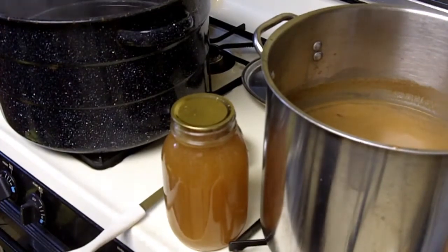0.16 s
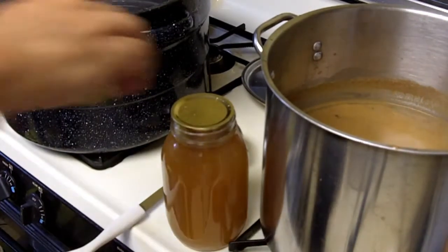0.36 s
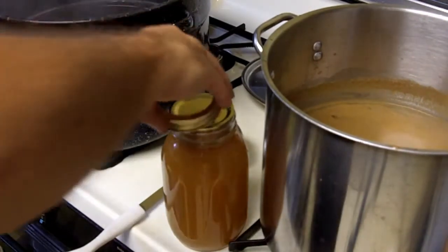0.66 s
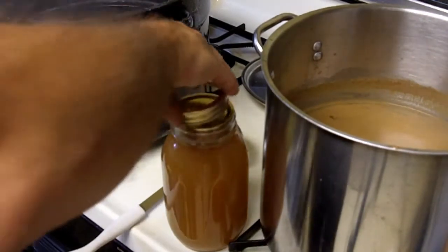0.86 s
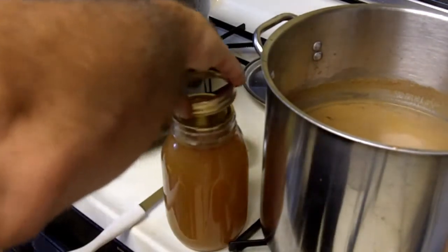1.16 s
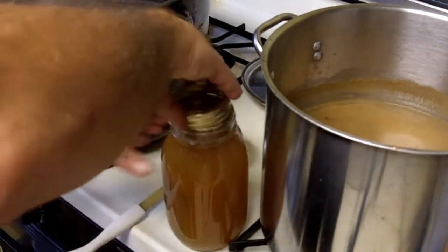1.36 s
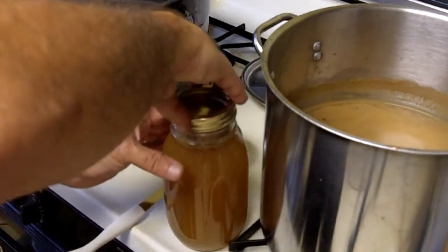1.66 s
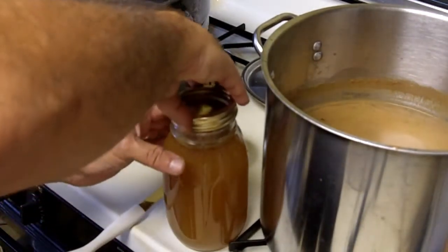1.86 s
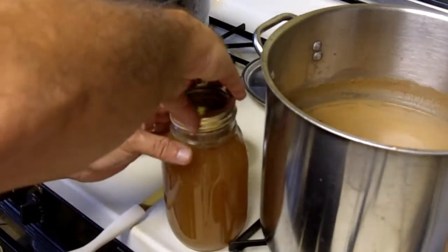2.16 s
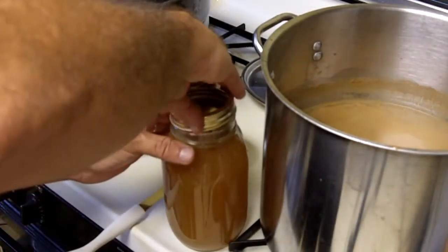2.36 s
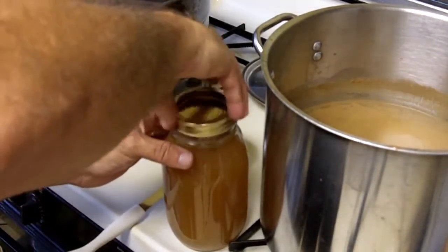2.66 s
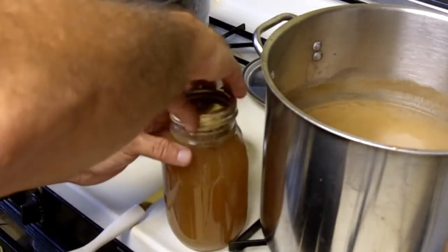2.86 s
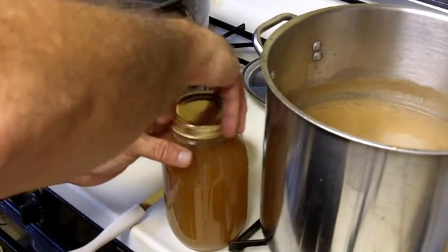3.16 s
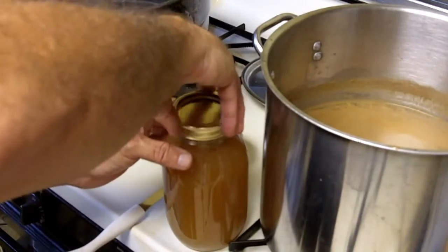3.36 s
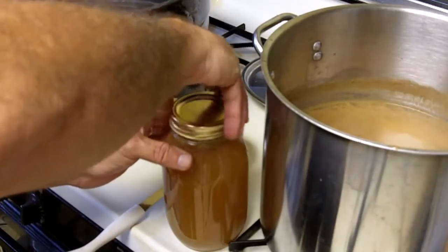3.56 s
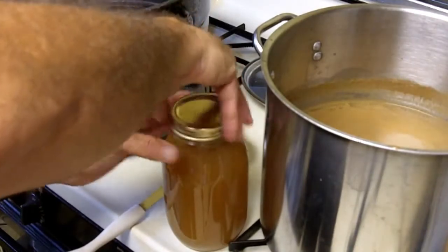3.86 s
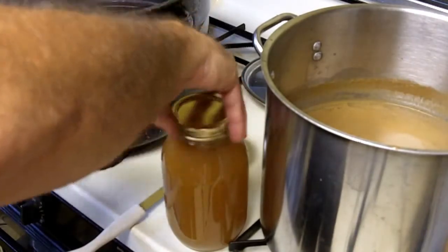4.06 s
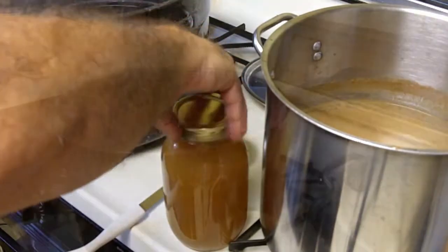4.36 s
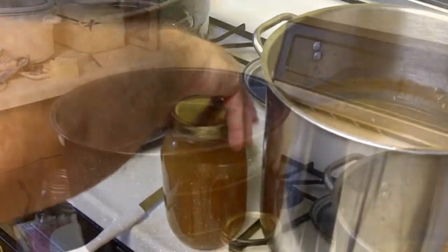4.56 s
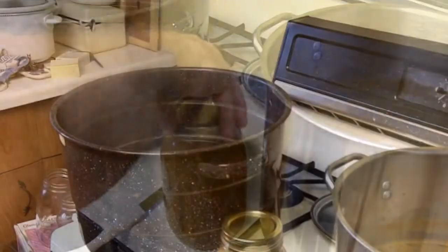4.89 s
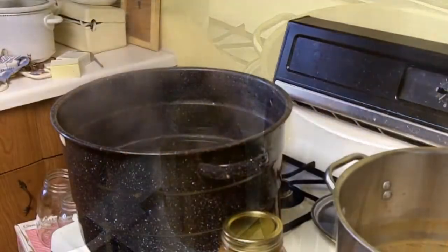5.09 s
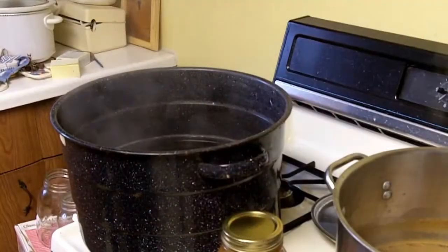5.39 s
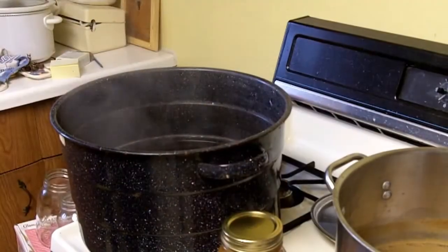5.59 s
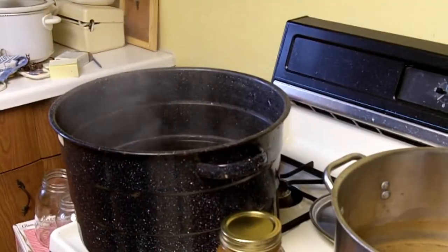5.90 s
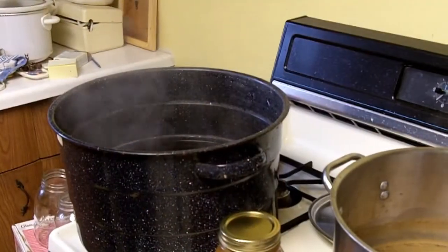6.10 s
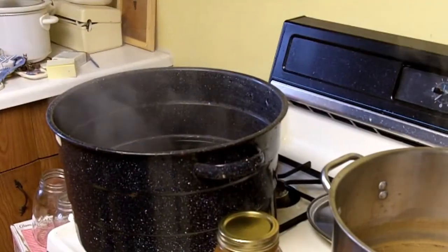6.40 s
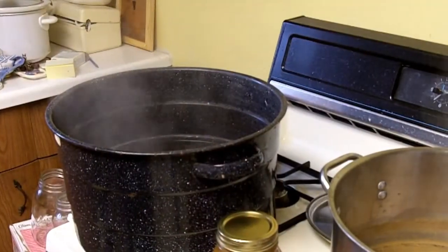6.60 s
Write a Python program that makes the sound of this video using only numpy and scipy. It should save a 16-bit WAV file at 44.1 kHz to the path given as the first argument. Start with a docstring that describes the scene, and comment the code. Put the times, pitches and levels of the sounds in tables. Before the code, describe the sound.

A quiet small kitchen, nearly mono, with faint hiss, slight mains hum and low hand-held rumble. From 0 to 1.5 s there are only soft camera jolts and arm or cloth rustle. Around 1.55 s sparse, faint ticks of a thin metal band on glass begin, close by. From 2.6 to 3.2 s they become brighter and louder, clustered clicks with short rasping thread scrapes. Soft bumps fall near 3.4 and 3.5 s, then tighter, drier scrapes at about 3.7, 4.0 and 4.3 s. Rustle rises; two dull knocks land near 4.65 s, lesser ones around 5.0 to 5.15 s, then tiny high clinks from 5.2 to 5.35 s with a soft low click. At 6.03 s a big pot clanks loudly, a hollow, quickly fading boom around 490 Hz. A faint wavering tone follows from 6.25 s, then softer, muffled pot thuds from 6.55 to 6.65 s.

```python
"""A metal screw band is set on a glass jar and turned down: struck modes tick, trains of tiny slips scrape.
Knocks (decaying noise) and bright clinks (high modes) are heard in the small kitchen.
Then a big pot of hot water clanks on the stove: low beating modes under upper wall modes; a faint tone swells.
A soft low click (filtered pulse) marks an edit cut.
A nearly mono hand-held camera adds rumble to coloured room noise, rustle, hiss and mains hum."""
import sys
import numpy as np
from scipy import signal
from scipy.fft import rfft, irfft, next_fast_len
from scipy.io import wavfile
from scipy.ndimage import uniform_filter1d

SR = 44100
rng = np.random.default_rng(int(sys.argv[2]) if len(sys.argv) > 2 else 0)


def master(y):
    """Save y as 16-bit WAV."""
    cut = np.clip(np.atleast_2d(y).T, -1, 1)
    pcm = np.round(cut * 32767)  # scale
    wavfile.write(sys.argv[1], SR, pcm.astype(np.int16))


N = 297234
TIME = np.arange(N) / SR
RING_TIME = TIME[:SR // 2]


def from_db(db):
    """Decibels to amplitude gain."""
    return 10 ** (np.asarray(db) / 20)


def rms_one(x):
    """Scale to unit power."""
    return x / np.sqrt(np.mean(x ** 2) + 1e-20)


def attack_one(x):
    """Scale a blow to unit power over its first 5 ms."""
    return x / np.sqrt(np.mean(x[:SR // 200] ** 2) + 1e-20)


def gains(rows):
    """Interpolate rows of (s, dB, ..) in dB into one gain curve per level column."""
    times_s, *columns_db = np.transpose(rows)
    return [from_db(np.interp(TIME, times_s, db)) for db in columns_db]


def cut(x, hz, kind, order=2):
    """Butterworth filter."""
    sections = signal.butter(order, np.minimum(hz, .45 * SR), kind, fs=SR, output="sos")
    return signal.sosfilt(sections, x + 1e-18)


def coloured(x, spectrum):
    """Shape x by (Hz, dB) points, with 12 dB/octave slopes outside them; unit power."""
    hz, db = np.transpose(spectrum)
    size = next_fast_len(len(x))
    f = np.maximum(np.arange(size // 2 + 1) * SR / size, 1)
    shape = from_db(np.interp(np.log(f), np.log(hz), db))
    shape = shape * np.minimum(f / hz[0], 1) ** 2 * np.minimum(hz[-1] / f, 1) ** 2
    return rms_one(irfft(rfft(x, size) * shape, size)[:len(x)])


def noise(spectrum, size=N):
    """Gaussian noise of a given colour; unit power."""
    return coloured(rng.standard_normal(size), spectrum)


def fade(t60_s):
    """Exponential decay, 60 dB in t60_s."""
    return from_db(-60 * RING_TIME / max(t60_s, 1e-3))


def crack(spectrum, t60_s):
    """Decaying noise: the dense, quickly dying modes of a contact."""
    return noise(spectrum, size=len(RING_TIME)) * fade(t60_s)


def ring(modes, pitch=1, uneven=False):
    """Sum of decaying sines; uneven varies mode strengths with where the blow lands."""
    offsets_db = uneven * rng.uniform(-4, 4, len(modes))
    total = 0
    for (hz, db, t60_s), offset_db in zip(modes, offsets_db):
        partial = np.sin(2 * np.pi * hz * pitch * RING_TIME) * fade(t60_s)
        total = total + from_db(db + offset_db) * partial
    return attack_one(total)


def add(track, start_s, sound):
    """Mix a sound in at a time."""
    start = round(start_s * SR)
    track[start:start + len(sound)] += sound[:N - start]


# Camera tremble, least while the jar is worked on. Each row: time in seconds, rumble in dB.
TREMBLE = [(0, -48.5), (1.6, -47.5), (2, -58), (3.3, -52.5), (4.3, -54.5), (4.7, -46), (5.6, -46.5),
           (6.74, -46)]
# Camera jolts. Each row: start in seconds, rumble in dB.
JOLTS = [(.33, -35.5), (.89, -37), (.99, -35.5), (1.24, -36), (4.44, -37), (5.68, -40)]
JOLT_ATTACK_S, JOLT_T60_S = 0.033, 1


def camera_shake():
    """Rumble gain: powers of a steady tremble and of jolts that rise quickly and sway to rest."""
    power = gains(TREMBLE)[0] ** 2
    for start_s, db in JOLTS:
        since_s = TIME - start_s
        rise = np.clip(since_s / JOLT_ATTACK_S, 0, 1)
        fall_db = 60 * np.maximum(since_s - JOLT_ATTACK_S, 0) / JOLT_T60_S
        power = power + (rise * from_db(db - fall_db)) ** 2
    return np.sqrt(power)


# Steady background. Each row: time in seconds, low room noise in dB, hiss in dB, both before layer trims.
AIR = [(0, -66, -69.5), (2.1, -64.5, -74.5), (4, -61.5, -69.5), (5, -60.5, -68), (6.74, -64, -75.5)]
# Arm and clothes moving. Each row: middle in seconds, length in seconds, hiss in dB, dull part in dB,
# both before layer trims.
RUSTLES = [(.38, 0.74, -64, -67), (0.9, 0.6, -69, -61), (1.327, 0.96, -64, -65.5), (1.75, 0.26, -68, -75),
           (2.385, 0.59, -75, -72), (3.494, 0.48, -76, -56), (3.8, .25, -101, -61.5),
           (4.618, 0.49, -60.5, -55.5), (4.813, 0.59, -60, -53.5), (5.086, 0.8, -62, -58),
           (5.789, 0.57, -65.5, -63), (6.456, 0.97, -66.5, -64), (6.717, 0.56, -76, -55.5)]


def air_and_rustle():
    """Room-noise and hiss gains: each movement is a half-cosine swell power-summed with the background."""
    room, hiss = gains(AIR)
    for middle_s, length_s, hiss_db, dull_db in RUSTLES:
        swell = np.cos(np.pi * np.clip((TIME - middle_s) / length_s, -.5, .5))
        room = np.hypot(room, from_db(dull_db) * swell)
        hiss = np.hypot(hiss, from_db(hiss_db) * swell)
    return room, hiss


# Noise colours. Each row: frequency in Hz, relative density in dB per Hz.
RUMBLE_COLOUR = [(11, -1), (15, 17), (19, -12), (25, 2.5), (45, -8.5), (70, -29.5), (110, -31.5),
                 (200, -34.5)]
ROOM_COLOUR = [(40, 6), (70, 12), (130, -7.5), (180, 0), (280, -5.5), (360, -4), (700, -12.5), (1200, -17),
               (2500, -60)]
HISS_COLOUR = [(300, 2.5), (900, 3.5), (1500, 3), (3000, -1.5), (4500, -2.5), (6500, 1), (9000, -8),
               (12000, -14), (15000, -20.5)]
# Mains hum. Each row: frequency in Hz, RMS level in dB.
HUM = [(120, -74), (240, -89.5)]


def background(rumble_db=0, room_db=1, hiss_db=1, side_db=-14):
    """Camera rumble, room noise, rustle and hiss as coloured noise, plus hum sines; almost mono."""
    room, hiss = air_and_rustle()
    still_room, still_hiss = gains(AIR)
    mid = from_db(rumble_db) * camera_shake() * noise(RUMBLE_COLOUR)
    mid = mid + from_db(room_db) * room * noise(ROOM_COLOUR)
    mid = mid + from_db(hiss_db) * hiss * noise(HISS_COLOUR)
    # jolts and rustle stay out of the side signal
    side = gains(TREMBLE)[0] * noise(RUMBLE_COLOUR)
    side = side + still_room * noise(ROOM_COLOUR) + still_hiss * noise(HISS_COLOUR)
    hum = sum(from_db(db) * np.sqrt(2) * np.sin(2 * np.pi * hz * TIME) for hz, db in HUM)
    return mid + hum + from_db(side_db) * side * [[1], [-1]]


def chatter(length_s, count=7):
    """A contact is a unit impulse followed by a quick string of random tiny bounces."""
    size = max(int(length_s * SR), 2)
    bounces = np.zeros(size)
    bounces[rng.integers(1, size, count)] = rng.normal(0, .5, count)
    bounces[0] = 1
    return bounces


# Register crossovers, low and high, in Hz.
SPLITS_HZ = [2000, 5400]


def registers(x):
    """Split a sound into top, middle and body."""
    low_hz, high_hz = SPLITS_HZ
    top = cut(x, high_hz, "high", order=4)
    middle = cut(x, SPLITS_HZ, "band", order=4)
    return top, middle, cut(x, low_hz, "low", order=4)


def tilted(db, brightness_db, wall_db=0):
    """Levels in dB of top, middle and body: brightness lifts the top and lowers the body."""
    return db + brightness_db, db + wall_db, db - brightness_db


# Band touching the glass. Each row: start in seconds, level in dB before register trims,
# brightness in dB, chatter length in seconds.
TICKS = [(1.554, -48, 0, .002), (1.758, -53.5, -6.5, 0.0031), (2.019, -53.5, 2.5, .003),
         (2.272, -54, -0.5, .005), (2.327, -60.5, -10.5, 0.011), (2.556, -56, 1, 0.0025),
         (2.597, -44, 3, 0.0036), (2.8036, -35, 5.5, 0.0059), (2.809, -37, 1, .003),
         (2.843, -37.5, 4.5, 0.0021), (2.864, -47.5, 1, 0.0052), (2.906, -49.5, -6.5, .0065),
         (2.943, -52.5, -1, 0.0039), (2.987, -50.5, 0.5, 0.00196), (3.1132, -57.5, -16.5, 0.0069),
         (3.127, -49.5, -6, 0.0026), (3.1593, -38.5, 7, 0.0039), (3.177, -41, 2.5, 0.0025),
         (3.193, -44, 1, .003), (3.397, -55, 11, .005), (3.8455, -57.5, 6.5, 0.0047),
         (3.998, -53, 1, 0.0048), (4.032, -47.5, 2.5, .008), (4.275, -50, 0, 0.0033),
         (4.294, -52.5, -5, 0.0049)]
# Band rings freely while loose, damped as it seats. Each row: time in seconds, ring over crack in dB,
# lift of the 2-5.4 kHz wall tones in dB.
LOOSENESS = [(1.5, 3, 1), (2.6, 0.5, 1), (3.2, -2, -1.5), (4.3, -13, -1.5)]
# Modes of the band on the jar. Each row: nominal frequency in Hz, relative level in dB, t60 in seconds.
BAND_MODES = [(818, -9.5, 0.49), (916, -2, 0.26), (936, 2, 0.12), (1377, -6, 0.15), (1463, -11.5, 0.17),
              (1647, -3, 0.077), (2610, -1.5, 0.029), (2815, -5, 0.039), (3070, 5, 0.026),
              (4230, -31, 0.097), (3945, 2, 0.026), (4334, -1.5, 0.05), (4590, -6.5, 0.11),
              (6220, -1.5, 0.058), (6300, -1.5, 0.075), (6790, 9, 0.018), (7480, 10, 0.013),
              (8200, -2, 0.049), (9340, 8.5, 0.016), (10030, 1, 0.028)]
# Metal-glass contact. Each row: frequency in Hz, relative density in dB per Hz.
CONTACT_COLOUR = [(300, -48), (550, -27), (780, 16), (1150, 4.5), (1500, 3), (2200, -12.5), (4300, -1),
                  (7000, 0.5), (10000, -9), (11500, -14.5), (15000, -40)]


def band_ticks(t60_s=0.041, soft_hz=13000, register_db=(-.5, .5, -.5)):
    """Each touch chatters into a crack and the band's modes, balanced by register."""
    out = np.zeros(N)
    times_s, *columns_db = np.transpose(LOOSENESS)
    for start_s, level_db, brightness_db, length_s in TICKS:
        grip = rng.normal(1, .012)   # pitch ratio: fingers bend the band a little out of tune
        ring_db, wall_db = [np.interp(start_s, times_s, column) for column in columns_db]
        modes = ring(BAND_MODES, pitch=grip, uneven=True)
        response = attack_one(crack(CONTACT_COLOUR, t60_s)) + from_db(ring_db) * modes
        blow = cut(signal.fftconvolve(response, chatter(length_s)), soft_hz, "low")
        levels_db = tilted(level_db, brightness_db, wall_db)
        for part, db, trim_db in zip(registers(blow), levels_db, register_db):
            loudest = np.sqrt(uniform_filter1d(part ** 2, size=SR // 250).max())   # 4 ms RMS
            add(out, start_s, from_db(db + trim_db) * part / loudest)
    return out


SWELL_DB, RELEASE_RANGE_DB = 12, 33.5   # rise up to the peak, fall until a push is over
BODY_RELEASE = 0.98   # body release rate / release rate


def push(swell_s, release_db_per_s):
    """Gains of one push, swelling to a peak then dying away: main, and the slower-fading body."""
    length_s = swell_s + RELEASE_RANGE_DB / release_db_per_s
    t = np.arange(int(length_s * SR)) / SR
    rise_db = SWELL_DB * np.minimum(t / swell_s - 1, 0)
    fall_db = release_db_per_s * np.maximum(t - swell_s, 0)
    return from_db(rise_db - fall_db), from_db(rise_db - BODY_RELEASE * fall_db)


def resound(slips, response):
    """A body's answer to a train of slips; unit power."""
    return rms_one(signal.fftconvolve(slips, response)[:len(slips)])


CATCHES_PER_S, CATCH_DB = 60, 13   # the thread snags and lets go with a larger slip


def slip_train(size, slips_per_s, spread_db, clump_db):
    """Random signed impulses whose rate clumps and whose sizes spread, plus larger catches."""
    catching = from_db(clump_db * noise([(30, 0), (90, -5.0), (250, -10.0)], size))
    slips = (rng.random(size) < slips_per_s * catching / SR) * rng.choice([-1, 1], size)
    slips = slips * from_db(spread_db * np.minimum(rng.exponential(1, size), 3))
    return slips + from_db(CATCH_DB) * (rng.random(size) < CATCHES_PER_S / SR)


# Finger pushes sliding the band along the thread. Each row: start in seconds, swell length in seconds,
# peak level in dB before register trims, brightness in dB, release in dB per second.
TURNS = [(2.599, 0.0051, -48.5, -1, 281.5), (2.851, 0.02, -50.5, -2, 116), (2.907, 0.0188, -52, -0.5, 200),
         (3.122, 0.0031, -49.5, -1, 207), (3.162, .008, -45, -6.5, 272.5), (3.216, 0.068, -48.5, 0.5, 204),
         (3.383, 0.0092, -65.5, -17.5, 171), (3.583, 0.015, -59, -1.5, 107),
         (3.677, 0.039, -52.5, -0.5, 425), (3.844, .006, -65, -15, 220), (3.979, 0.07, -44.5, -1, 380.5),
         (4.268, 0.054, -48, 0, 388.5)]
# A tight band shakes the whole jar. Each row: frequency in Hz, relative level in dB, t60 in seconds.
JAR_MODES = [(453, -6.5, 0.099), (545, 3, .11), (939.4, 5.5, .22), (1385, -8, .09), (1580, 1, .12)]
# Jar modes over the rest of the body. Each row: time in seconds, ratio in dB.
SEATING = [(2.6, 1.5), (3.2, -11.5), (3.8, -8), (4.0, 10.5), (4.35, 8)]


def thread_scrape(slips_per_s=1600, spread_db=5, clump_db=5, ring_db=-3.0, soft_hz=11500,
                  register_db=(-2, -3, -3)):
    """Clumps of tiny slips of metal over glass excite the band's modes, differently with each grip."""
    out = np.zeros(N)
    finger_damping = fade(.06)
    for start_s, swell_s, level_db, brightness_db, release_db_per_s in TURNS:
        effort, body_effort = push(swell_s, release_db_per_s)
        size = len(effort)
        slips = slip_train(size, slips_per_s, spread_db, clump_db)
        # the contact point travels round the rim: crossfade between two responses
        first, last = [resound(slips, finger_damping * ring(BAND_MODES, pitch=grip, uneven=True))
                       for grip in rng.normal(1, .035, 2)]
        angle = np.linspace(0, np.pi / 2, size)
        ringing = np.cos(angle) * first + np.sin(angle) * last
        rub = coloured(slips, CONTACT_COLOUR) + from_db(ring_db) * ringing
        top, middle, body = map(rms_one, registers(cut(rub, soft_hz, "low", order=3)))
        seating = from_db(np.interp(start_s, *np.transpose(SEATING)))
        body = (body + seating * resound(slips, ring(JAR_MODES))) / np.hypot(1, seating)
        parts = top * effort, middle * effort, body * body_effort
        for part, db, trim_db in zip(parts, tilted(level_db, brightness_db), register_db):
            add(out, start_s, from_db(db + trim_db) * part)
    return out


# Small things bumped or shoved. Each row: start in seconds, level in dB before the common trim,
# t60 in seconds, attack in seconds.
KNOCKS = [(3.365, -48.5, 0.34, 0.015), (3.502, -46.5, 0.2, 0.00077), (4.589, -46, 0.15, 0.016),
          (4.655, -36.5, 0.15, 0.00081), (4.686, -32.5, 0.15, 0.0012), (5.0, -43.5, 0.17, .001),
          (5.055, -48, .06, .003), (5.141, -49, 0.16, 0.0018), (6.311, -47.5, 0.12, 0.0033)]
# Each row: frequency in Hz, relative density in dB per Hz.
KNOCK_COLOUR = [(150, -1), (290, -5.5), (370, 6.5), (500, -10), (900, 3), (1800, -0.5), (3000, -9),
                (4500, -9), (7000, -7), (10000, -23), (15000, -70)]


def knocks(level_db=-1, grit_db=3.0):
    """Damped things bumped farther off: decaying noise, unevenly modulated as they rattle and settle."""
    out = np.zeros(N)
    for start_s, db, t60_s, attack_s in KNOCKS:
        grit = rms_one(from_db(grit_db * noise([(60, -3), (400, -7)], len(RING_TIME))))
        attack = np.minimum(RING_TIME / attack_s, 1)
        add(out, start_s, from_db(db + level_db) * attack * grit * crack(KNOCK_COLOUR, t60_s))
    return out


# Light bright clinks. Each row: start in seconds, level in dB before the ring and crack trims.
CLINKS = [(5.1826, -49), (5.2593, -51.5), (5.309, -41), (5.3336, -45)]
# Each row: frequency in Hz, relative level in dB, t60 in seconds.
CLINK_MODES = [(4930, -26, 0.11), (6220, 3, 0.12), (7340, -14, 0.12), (7730, -4, 0.35), (8100, -14, 0.11),
               (8500, -2, 0.14), (9650, -11, 0.1), (10500, -10, 0.13), (11100, -8, 0.15),
               (13410, -13, 0.11)]
# Each row: frequency in Hz, relative density in dB per Hz.
CLINK_COLOUR = [(500, -15), (2500, -10), (4500, -8), (7500, 1.5), (10500, -5), (15000, -24)]


def clinks(ring_db=-10, crack_db=-4, t60_s=0.22):
    """Small hard things touch: high modes plus a bright crack."""
    out = np.zeros(N)
    for start_s, db in CLINKS:
        ringing = from_db(ring_db) * ring(CLINK_MODES, uneven=True)
        contact = from_db(crack_db) * crack(CLINK_COLOUR, t60_s)
        add(out, start_s, from_db(db) * (ringing + contact))
    return out


EDIT_CLICK_S, EDIT_CLICK_DB = 5.331, -44


def edit_click(t60_s=0.02):
    """One soft low click at an edit cut: a short decaying pulse, band-passed."""
    out = np.zeros(N)
    click = attack_one(cut(fade(t60_s), [60, 400], "band", order=1))
    add(out, EDIT_CLICK_S, from_db(EDIT_CLICK_DB) * click)
    return out


# Blows on the pot wall. Each row: start in seconds, level of the unfiltered boom in dB,
# hardness (low-pass) in Hz, boom length ratio, dull rattle relative to the boom in dB.
CLANKS = [(6.0277, -17.5, 9000, 1, -17), (6.5544, -35.5, 1790, 0.58, -13), (6.612, -36.5, 2420, 0.36, -6),
          (6.641, -35, 1390, 0.5, -14)]
# Two close low modes that beat. Each row: frequency in Hz, relative level in dB, t60 in seconds at ratio 1.
POT_BOOM = [(471.2, 3.5, .24), (492.8, 10.5, 0.22)]
# Upper and other wall modes. Each row: frequency in Hz, relative level in dB, t60 in seconds.
POT_MODES = [(171.7, -6, 0.21), (632, 1.5, 0.084), (685, 0.5, 0.13), (795, -4, 0.27), (920, -21, .3),
             (1005, -9.5, 0.24), (1094, -14.5, 0.35), (1427, -14, 0.25), (1663, -17, 0.24),
             (1940, -26, 0.22), (2116, -28, .17), (2425, -13, 0.17), (2622, -28, 0.22), (2830, -22, 0.36),
             (2903, -10.5, .17), (3040, -32, .24)]
# Dull rattle. Each row: frequency in Hz, relative density in dB per Hz.
POT_THUD = [(100, -28), (180, -13.5), (280, -32), (400, 6), (600, -1), (820, 9.5), (1100, -17), (1600, -7),
            (2200, -17.5), (3000, -13.5), (4300, -20.5), (8000, -25.5), (15000, -48)]


def pot_clanks(modes_db=-10, t60_s=0.24):
    """The thin steel wall booms low and rings above; softer blows are duller with a shorter boom."""
    out = np.zeros(N)
    for start_s, db, hardness_hz, length_ratio, rattle_db in CLANKS:
        boom = ring([(hz, level_db, decay_s * length_ratio) for hz, level_db, decay_s in POT_BOOM])
        # wall modes start in opposite phase to the boom
        blow = boom - from_db(modes_db) * ring(POT_MODES)
        blow = blow + from_db(rattle_db) * crack(POT_THUD, t60_s)
        add(out, start_s, from_db(db) * cut(blow, hardness_hz, "low"))
    return out


# Faint tone between the clanks. Each row: time in seconds, RMS level in dB.
SINGING = [(6.22, -88.5), (6.29, -62), (6.37, -61), (6.46, -58), (6.53, -85)]
SINGING_HZ = 525


def singing(waver_hz=4):
    """A faint sine whose frequency wavers with slow noise (waver_hz RMS)."""
    hz = SINGING_HZ + waver_hz * noise([(3, -10), (15, 4)])
    return gains(SINGING)[0] * np.sqrt(2) * np.sin(2 * np.pi * np.cumsum(hz) / SR)


KITCHEN_T60_S = 0.28


def kitchen(x, wet_db, width_db):
    """Direct sound plus the diffuse noise tail of a small hard room, slightly different per channel."""
    colour = [(150, 0.5), (800, -0.5), (4000, -3), (8000, -8.5), (15000, -0.5)]
    mid, side = [crack(colour, KITCHEN_T60_S) for _ in range(2)]
    onset = np.clip(RING_TIME / 0.0087 - .5, 0, 1)   # silent 4.35 ms, full at 13 ms
    tails = (mid + from_db(width_db) * side * [[1], [-1]]) * onset
    wet = signal.fftconvolve([x], tails / np.linalg.norm(tails[0]), axes=1)[:, :N]
    return x + from_db(wet_db) * wet


def scene():
    """The jar is close, the knocked things lie deeper in the room; tone, click and background stay dry."""
    jar = kitchen(band_ticks() + thread_scrape(), wet_db=-7.5, width_db=-31.5)
    stove = kitchen(knocks() + clinks(), wet_db=-5.5, width_db=-32)
    pot = kitchen(pot_clanks(), wet_db=-14, width_db=-38)
    return background() + jar + stove + edit_click() + pot + singing()


NOTCH_HZ, NOTCH_WIDTH_HZ, CUTOFF_HZ = 5426, 1440, 15100
# Constant offset. Each row: one channel, amplitude with full scale 1.
OFFSET = [
    [.030],
    [.011],
]


def record(dry):
    """The camera has a deep notch in the treble, a steep top cut and a constant offset."""
    notched = signal.lfilter(*signal.iirnotch(NOTCH_HZ, NOTCH_HZ / NOTCH_WIDTH_HZ, fs=SR), dry)
    top_cut = signal.ellip(10, .1, 80, CUTOFF_HZ, fs=SR, output="sos")
    return signal.sosfilt(top_cut, notched) + OFFSET


dry = scene()
out = record(dry)
master(out)
```